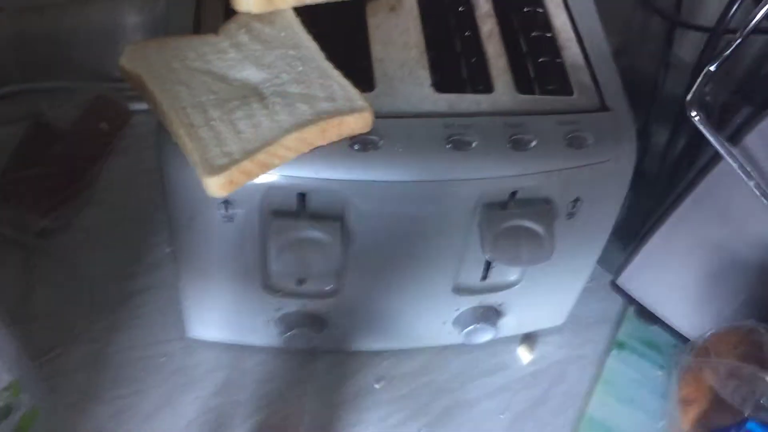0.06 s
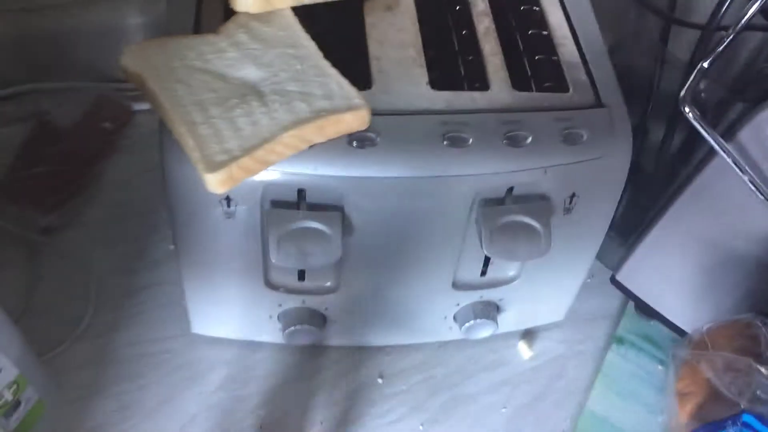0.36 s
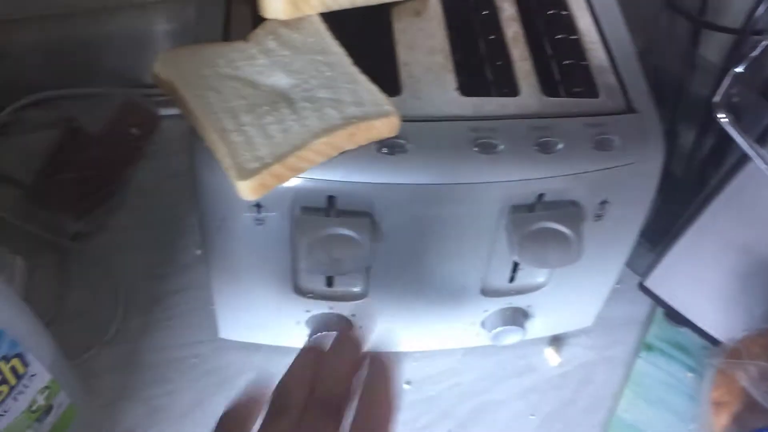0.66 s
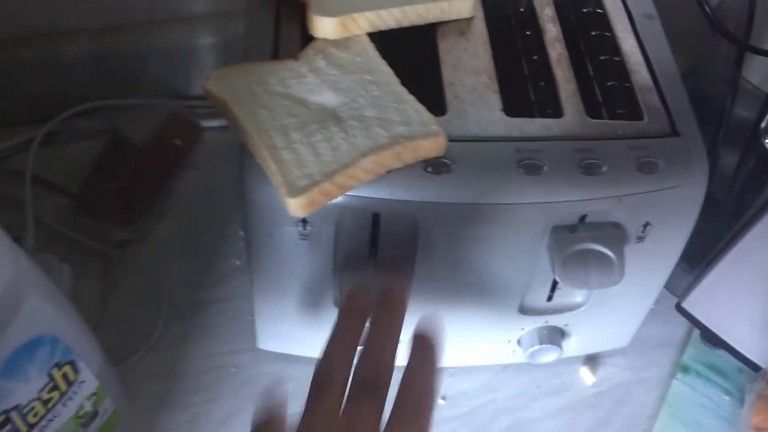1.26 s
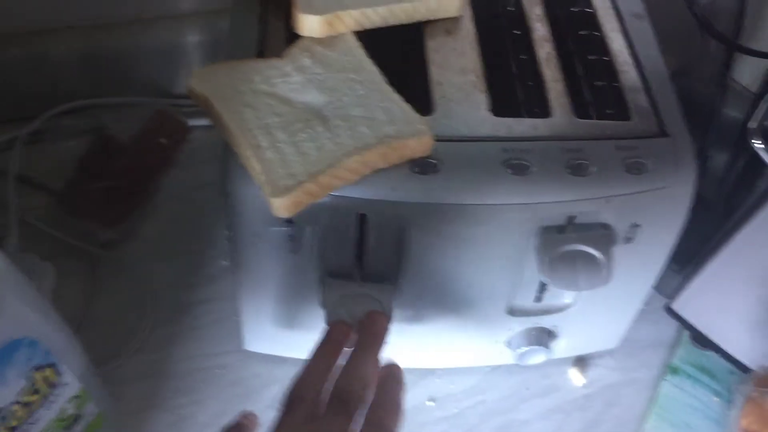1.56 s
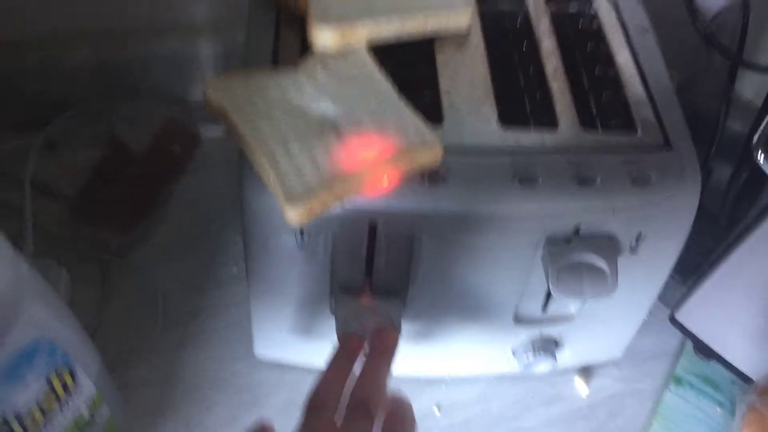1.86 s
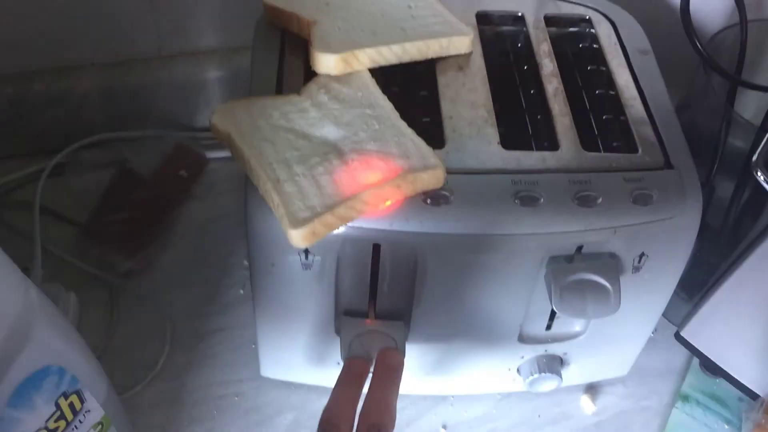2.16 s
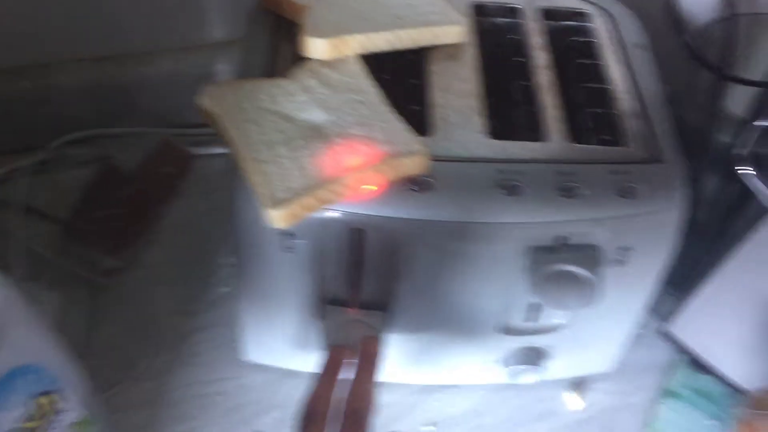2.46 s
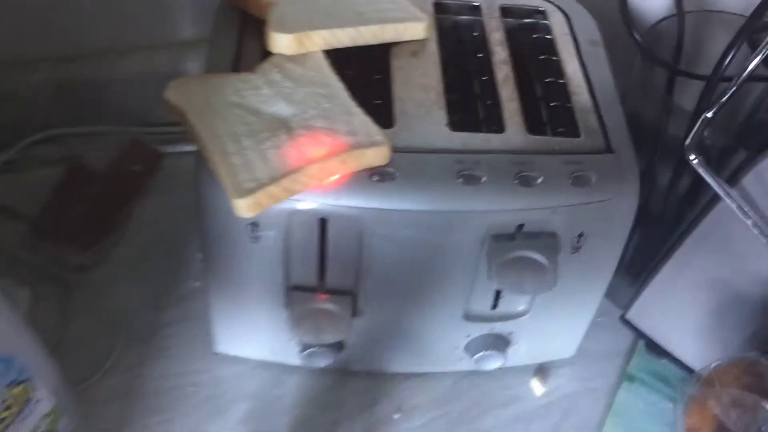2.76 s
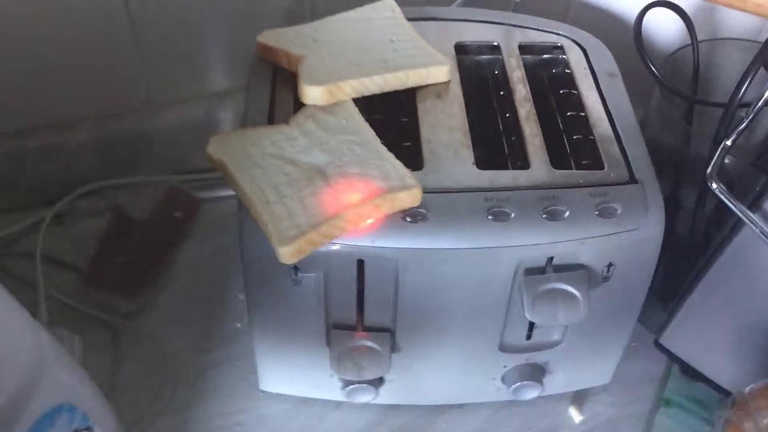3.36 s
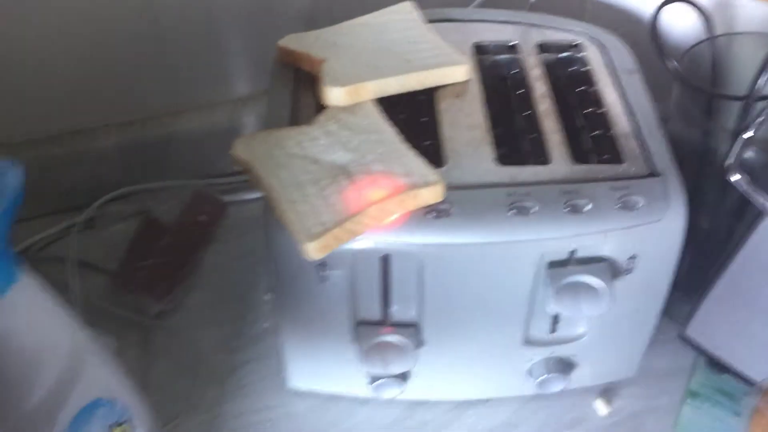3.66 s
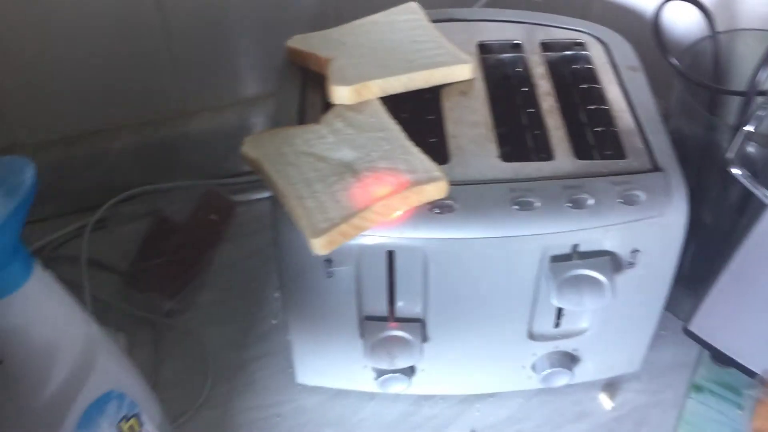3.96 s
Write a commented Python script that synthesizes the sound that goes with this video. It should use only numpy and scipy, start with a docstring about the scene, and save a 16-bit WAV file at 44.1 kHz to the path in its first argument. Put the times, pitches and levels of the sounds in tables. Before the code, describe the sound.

A toaster pops up with a loud metal clatter and a springy shudder. Its lever is pushed down with scrapes and ticks, snaps sharply, then latches with a clunk, close by in a quiet kitchen with a low hum.

```python
"""A toaster, close by on a kitchen counter. The latch lets go and the sprung metal carriage flies up,
rattles and shudders; fingers push the lever down again with scrapes and ticks, it snaps against its
stop, and on release the latch catches it with a clunk. Wire guards and thin panels ring along, and
the case thumps on the counter. Behind it in a small room: dull knocks, a brief brushing, a low hum."""
import sys
import numpy as np
from scipy import signal
from scipy.fft import rfft
from scipy.io import wavfile
from scipy.ndimage import uniform_filter1d

SR = 44100
rng = np.random.default_rng(int(sys.argv[2]) if len(sys.argv) > 2 else 0)


def wrap_up_sound(samples):
    """Save the sound to the file named by the first command line argument, as 16-bit audio."""
    columns = np.atleast_2d(samples).T
    # keep every value between -1 and 1, then stretch to whole-number steps
    tamed = np.clip(columns, -1, 1)
    steps = np.round(tamed * 32767).astype(np.int16)
    wavfile.write(sys.argv[1], SR, steps)


N = 176400
T = np.arange(N) / SR
EVENT_T = T[:SR]  # 1 s time axis of one event


def undb(db):
    """Decibels to gain."""
    return 10 ** (np.asarray(db) / 20)


def unit(x):
    """Scale to rms 1."""
    return x / np.sqrt(np.mean(x ** 2) + 1e-20)


def fade(t60_s, t=EVENT_T):
    """Exponential decay, 60 dB down at t60_s."""
    return np.exp(-np.log(1000) * t / t60_s)


def colour(x, spectrum, tilt_db_oct=0):
    """Shape by a spectrum and a tilt; rms 1."""
    octave = np.log2(np.maximum(np.fft.rfftfreq(len(x), 1 / SR), 1))
    hz, db = np.array(spectrum).T
    gain_db = np.interp(octave, np.log2(hz), db) + tilt_db_oct * np.maximum(octave, np.log2(hz[0]))
    return unit(np.fft.irfft(rfft(x) * undb(gain_db), len(x)))


def band_noise(samples, low_hz, high_hz, order):
    """Band-passed noise; rms 1."""
    sos = signal.butter(order, [low_hz, high_hz], "band", fs=SR, output="sos")
    return unit(signal.sosfilt(sos, rng.standard_normal(samples)))


def modes(table, scatter_db=0):
    """Decaying partials of random sign and optional level scatter; rms 1 at the start."""
    hz, db, t60_s = np.array(table).T
    chance = rng.standard_normal((len(hz), 2))
    gains = undb(db + scatter_db * chance[:, 0]) * np.sign(chance[:, 1])
    waves = np.sin(2 * np.pi * hz[:, None] * EVENT_T) * fade(t60_s[:, None])
    return gains @ waves / np.sqrt(np.sum(gains ** 2) / 2)


def chatter(grain_samples=60, spread_db=1.5):
    """Noise broken into millisecond contacts of loose parts."""
    grain = uniform_filter1d(rng.standard_normal(SR), grain_samples) * np.sqrt(grain_samples)
    return rng.standard_normal(SR) * undb(spread_db * grain)


def ticks(per_s, spread_db=3, t60_s=0.041):
    """Random tiny contacts of uneven strength, each a decaying noise burst."""
    hits = (rng.random(SR) < per_s / SR) * undb(spread_db * rng.standard_normal(SR))
    power = signal.fftconvolve(hits ** 2, fade(t60_s) ** 2)[:SR]
    return rng.standard_normal(SR) * np.sqrt(np.abs(power))


def add(out, start_s, sound):
    """Mix a sound in at start_s, at the earliest at 0."""
    i = max(int(start_s * SR), 0)
    out[i:i + len(sound)] += sound[:N - i]


# room air (frequency [Hz], density [dB])
AIR_SPECTRUM = [(25, -17.5), (55, 2.5), (110, 0.5), (170, -23), (270, -4), (420, -21), (660, -11.5),
                (1000, -22), (2000, -26), (4000, -37.5), (8000, -39.5), (15000, -49)]
def air(level_db=-54):
    """Steady, bass-heavy room noise."""
    return undb(level_db) * colour(rng.standard_normal(N), AIR_SPECTRUM)


# hum partials (frequency [Hz], level [dB])
HUM_PARTIALS = [(52, -59), (115.5, -51.5), (198, -63), (265, -67.5)]
def hum(wobble_rad=0.25):
    """Low appliance hum, slightly unsteady in phase."""
    out = np.zeros(N)
    for hz, db in HUM_PARTIALS:
        phase = 2 * np.pi * hz * T + wobble_rad * band_noise(N, 0.5, 20.5, order=2)
        out += undb(db) * np.sqrt(2) * np.sin(phase)
    return out


# reflections (frequency [Hz], density [dB])
ROOM_SPECTRUM = [(60, -10.5), (250, 2), (1000, -3), (3000, -6), (7000, -10), (15000, -3.5)]
def kitchen(x, wet_db=-14, t60_s=0.3, treble_t60_s=0.15, split_hz=4500, delay_s=0.006):
    """Add dense reflections from counter and walls; the treble dies first."""
    echoes = colour(rng.standard_normal(SR), ROOM_SPECTRUM)
    low = signal.sosfiltfilt(signal.butter(2, split_hz, fs=SR, output="sos"), echoes)
    tail = low * fade(t60_s) + (echoes - low) * fade(treble_t60_s)
    out = x.copy()
    add(out, delay_s, undb(wet_db) * signal.fftconvolve(x, tail / np.linalg.norm(tail))[:N])
    return out


# brushing hiss before tilt (frequency [Hz], density [dB])
BRUSH_SPECTRUM = [(290, -45), (500, 2), (655, 5), (714, -14.5), (1230, 3.5), (1630, -3.5), (1960, -3),
                  (2640, -1), (15000, -8.5)]
def brush(start_s=3.355, peak_s=3.535, attack_s=0.024, hiss_db=-42, flick_db=-40.5):
    """A light brushing contact swells, slips off with a flick and fades."""
    from_peak_s = T - peak_s
    onset = np.clip((T - start_s) / attack_s, 0, 1)
    swell = onset * fade(1, np.maximum(-from_peak_s, 0)) * fade(0.15, np.maximum(from_peak_s, 0))
    hiss = colour(rng.standard_normal(N), BRUSH_SPECTRUM, tilt_db_oct=2.3)
    flick = band_noise(N, 980, 4600, order=1) * fade(0.094, np.abs(from_peak_s))
    return undb(hiss_db) * swell * hiss + undb(flick_db) * flick


# hollow boom (frequency [Hz], level [dB], t60 [s])
HOLLOW_MODES = [(257.6, -2.5, 0.26), (302.4, -3, 0.11), (690.6, 0, 0.068)]
# knocks (time [s], level [dB], upper edge [Hz], lower edge [Hz], hold [s], boom peak [dB])
DULL_KNOCKS = [(0.386, -39, 1730, 1104, 0.02, -39.5), (0.674, -36.5, 1345, 572, 0.021, -29.5),
               (0.867, -57, 3500, 600, .02, -60.5), (1.552, -46.5, 1300, 780, 0.022, -58),
               (1.713, -38.5, 1360, 600, 0.021, -30.5), (2.446, -54, 1110, 351, 0.013, -74),
               (2.671, -52.5, 1400, 397, .03, -53), (3.002, -51.5, 2600, 515, 0.024, -57),
               (3.118, -55.5, 2360, 500, 0.015, -47.5), (3.27, -63.5, 1500, 551, .025, -65),
               (3.645, -63, 1300, 550, 0.024, -61.5), (3.80, -63, 2200, 560, 0.024, -62)]
def knocks(t60_s=0.2, boom_t60_s=0.25, boom_hold_s=0.04, boom_lag_s=0.0081):
    """Dull, smeared knocks, each followed by a rough hollow boom."""
    out = np.zeros(N)
    for start_s, db, high_hz, low_hz, hold_s, boom_db in DULL_KNOCKS:
        envelope = (1 - fade(0.008)) * fade(t60_s, np.maximum(EVENT_T - hold_s, 0))
        add(out, start_s, undb(db) * envelope * band_noise(SR, low_hz, high_hz, order=3))
        drive = rng.standard_normal(SR) * fade(boom_t60_s, np.maximum(EVENT_T - boom_hold_s, 0))
        boom = signal.fftconvolve(drive, modes(HOLLOW_MODES))[:SR]
        add(out, start_s + boom_lag_s, undb(boom_db) * boom / np.abs(boom).max())
    return out


# case on the counter (frequency [Hz], level [dB], t60 [s])
THUMP_MODES = [(59, -8, 0.15), (93, 1.5, 0.26), (135, -4, .1), (173, -13, 0.064), (235, -2.5, 0.04),
               (257, -3.5, 0.17), (341, -12.5, 0.11), (385, -17, 0.063), (467, -17.5, 0.067)]
# thumps (time [s], level [dB], tilt [dB/oct])
CASE_THUMPS = [(0.014, -28.5, 8.5), (0.025, -25.5, -6), (0.05, -23.5, -3), (0.081, -17.5, 4.5),
               (.094, -19, 8.5), (0.142, -26, -7), (0.251, -38, 8), (1.046, -42, 12), (1.071, -32, -8),
               (1.106, -54, -5), (1.154, -35.5, 5), (1.186, -35, 8), (1.291, -41, 3), (1.336, -44, 4),
               (1.368, -28, 4), (1.655, -37, -4), (2.075, -44.5, -3.5), (2.315, -29, -3.5),
               (2.459, -41.5, 0), (2.675, -37, 0), (2.704, -32, 3), (2.745, -20, 8), (2.755, -22.5, -0.5),
               (2.791, -30, 1)]
def case():
    """The case thumps on the counter and rings in its low modes."""
    out = np.zeros(N)
    hz, mode_db, t60_s = np.array(THUMP_MODES).T
    attack = 1 - fade(0.0056)
    waves = np.sin(2 * np.pi * hz[:, None] * EVENT_T) * fade(t60_s[:, None]) * attack
    for start_s, db, tilt_db_oct in CASE_THUMPS:
        gains = undb(mode_db + tilt_db_oct * np.log2(hz))
        add(out, start_s, undb(db) * gains @ waves / np.sqrt(np.sum(gains ** 2) / 2))
    return out


# steel shell (frequency [Hz], level [dB], t60 [s])
STEEL_SHELL_MODES = [(361, -14.5, 0.12), (1173, -8, 0.099), (1410, -3, 0.074), (1572, 2, 0.061),
                     (1700, -2.5, 0.044), (2150, -8, .1), (2700, -25, .25), (3190, -11.5, 0.23),
                     (3770, -12.5, 0.13), (4170, -6, .1)]
# end-stop hits (time [s], level [dB])
STOP_HITS = [(0.0797, -6.5), (1.373, -57), (1.6374, -38.5), (2.7414, -29.5)]
def shell():
    """The carriage hits an end stop and rings the steel shell."""
    out = np.zeros(N)
    for start_s, db in STOP_HITS:
        add(out, start_s, undb(db) * modes(STEEL_SHELL_MODES))
    return out


# latch (frequency [Hz], level [dB], t60 [s])
CLINK_MODES = [(1043, -7, .1), (1455, -5, 0.078), (1780, -2, 0.035), (3038, -0.5, 0.13)]
def latch(start_s=2.7425, level_db=-21.5):
    """The latch catches and clinks."""
    out = np.zeros(N)
    add(out, start_s, undb(level_db) * modes(CLINK_MODES))
    return out


# lever crack (frequency [Hz], density [dB])
CRACK_SPECTRUM = [(150, -5.5), (800, -21), (1400, -18.5), (2000, -10), (3300, 3), (4100, -14),
                  (4600, -32.5), (5400, -6.5), (10000, -19), (15000, -40.5)]
# plastic lever (frequency [Hz], level [dB], t60 [s])
PLASTIC_MODES = [(803, -16, 0.016), (1976, -3, 0.027), (2200, 2, 0.027), (2580, -6, 0.016),
                 (2793, -4.5, 0.044), (3270, -5.5, .018), (3980, -3.5, .018)]
# snaps (time [s], level [dB])
LEVER_SNAPS = [(2.0728, -26.5), (2.3131, -7.5), (2.3165, -17.5)]
def lever(crack_db=-8.5, crack_t60_s=0.041):
    """The lever snaps: a short crack and quickly damped plastic modes."""
    out = np.zeros(N)
    for start_s, db in LEVER_SNAPS:
        crack = colour(rng.standard_normal(SR), CRACK_SPECTRUM) * fade(crack_t60_s)
        add(out, start_s, undb(db) * (modes(PLASTIC_MODES) + undb(crack_db) * crack))
    return out


def spring(start_s=0.25, hz=79, gain_db=-24.5, rise_s=0.17, t60_s=1.4):
    """The carriage shudders on its spring after flying up."""
    out = np.zeros(N)
    envelope = (1 - np.exp(-T / rise_s)) * fade(t60_s, T)
    add(out, start_s, undb(gain_db) * envelope * np.sin(2 * np.pi * hz * T))
    return out


# wire guards (frequency [Hz], level [dB], t60 [s])
GUARD_MODES = [(1310, -4, 0.3), (2110, -2.5, 0.22), (2740, -5, .3), (3580, -4, 0.13), (4230, -3, .2),
               (5220, -5.5, 0.33), (6180, -6, .3), (7720, -7.5, .3), (12400, 2.5, .25), (14995, 0, 0.28)]
def steel(x, wire_db=-15, panel_db=-7, panel_modes=320, mean_t60_s=0.073):
    """Wire guards and the crowded resonances of thin panels ring along with x."""
    chance = rng.random((panel_modes, 2))
    panel_table = [(700 + 14500 * place ** 1.4, 0, mean_t60_s * (0.5 + life)) for place, life in chance]
    panels = modes(panel_table, scatter_db=5)
    wires = modes(GUARD_MODES)
    ring = undb(panel_db) * panels / np.linalg.norm(panels)
    ring += undb(wire_db) * wires / np.linalg.norm(wires)
    return (x + signal.fftconvolve(x, ring)[:N]) / np.sqrt(1 + np.sum(ring ** 2) / 2)


# sheet metal, for scrapes and carriage (frequency [Hz], density [dB])
METAL_SPECTRUM = [(150, -5), (300, -3), (700, -6), (1400, -3), (2500, -3), (3800, -1.5), (4700, -5.5),
                  (6000, -2.5), (9000, -7.5), (10500, -11), (12000, -7), (15500, -25)]
# sliding contacts (start [s], peak [s], end [s], level [dB], tilt [dB/oct])
SLIDES = [(-.1, 0, 0.18, -50, -2.5), (0.219, 0.277, 0.48, -41, -1.5), (1.119, 1.208, 1.36, -48.5, -2),
          (1.276, 1.338, 1.494, -35, -0.5), (1.387, 1.417, 1.94, -51.5, -2.5),
          (1.694, 1.795, 2.056, -50.5, -1.5), (2.08, 2.16, 1.89, -49, 7), (2.771, 2.974, 2.99, -56.5, 1),
          (2.799, 3.021, 3.4, -60.5, -4.5), (0.421, 0.52, 0.72, -49.5, -6)]
def scrapes(slips_per_s=430):
    """Sliding contact: dense tiny slips swell and die away with the pressure."""
    out = np.zeros(N)
    for start_s, peak_s, end_s, db, tilt_db_oct in SLIDES:
        pressure = np.interp(EVENT_T + max(start_s, 0), [start_s, peak_s, end_s], [0, 1, 0]) ** 1.11
        slips = colour(ticks(slips_per_s), METAL_SPECTRUM, tilt_db_oct)
        add(out, start_s, undb(db) * pressure * slips)
    return out


# carriage blows (time [s], level [dB], tilt [dB/oct], clatter t60 [s])
CARRIAGE_BLOWS = [(0.036, -16, 2, 0.33), (0.0494, -9.5, 2.5, 0.11), (0.08, -10.5, -1.5, 0.13),
                  (.091, -13.5, 8.5, .12), (.139, -17.5, 2, 0.061), (.1465, -23, 0.5, 0.093),
                  (0.245, -27, 3, .09), (.277, -36, -1.5, 0.057), (0.36, -48, -25.5, .08),
                  (.455, -49, 7, 0.055), (1.0431, -37, 1, 0.19), (1.061, -35.5, -1, 0.18),
                  (1.1021, -28, -1, 0.18), (1.3305, -28, 4, 0.24), (1.371, -32.5, -.5, 0.18),
                  (1.4959, -39.5, -0.5, 0.05), (1.6385, -39, -3, 0.17), (1.6788, -42, 5, 0.077),
                  (1.788, -46.5, 1.5, 0.11), (1.878, -35.5, 0, .13), (1.9746, -47.5, 1, 0.07),
                  (2.03, -41.5, 5.5, 0.012), (2.0711, -30.5, -0.5, 0.24), (2.117, -40, -1.5, 0.21),
                  (2.508, -46, 2, .08), (2.705, -45, -2, 0.13), (2.741, -19, -0.5, 0.075),
                  (2.7483, -25.5, 12, 0.058)]
def carriage(attack_s=0.0016, rattle_db=-22.5, shimmer_db=-34):
    """Each blow of the metal carriage clatters, leaves loose parts ticking and the springs shimmering."""
    out = np.zeros(N)
    attack = np.minimum(EVENT_T / attack_s, 1)
    for start_s, db, tilt_db_oct, t60_s in CARRIAGE_BLOWS:
        clatter = colour(chatter(), METAL_SPECTRUM, tilt_db_oct) * fade(t60_s)
        rattle = colour(ticks(per_s=83), METAL_SPECTRUM, tilt_db_oct - 0.6) * fade(t60_s=0.66)
        shimmer = band_noise(SR, 1500, 4330, order=3) * fade(t60_s=1.37)
        blow = clatter + undb(rattle_db) * rattle + undb(shimmer_db) * shimmer
        add(out, start_s, undb(db) * attack * blow)
    return out


def scene():
    """Toaster, brushing and knocks in the kitchen; spring, hum and air bypass the reflections."""
    toaster = steel(carriage() + scrapes()) + case() + shell() + latch() + lever()
    room = kitchen(toaster + brush() + knocks())
    return (room + spring() + hum() + air())[None]


def record(dry, low_hz=42, ceiling=0.85, top_hz=15500):
    """The microphone drops the deepest bass, rounds the peaks and cuts the top."""
    x = signal.sosfilt(signal.butter(4, low_hz, "high", fs=SR, output="sos"), dry)
    rounded = ceiling * np.tanh(x / ceiling)
    return signal.sosfilt(signal.ellip(10, 0.2, 80, top_hz, fs=SR, output="sos"), rounded)


dry = scene()
out = record(dry)
wrap_up_sound(out)
```